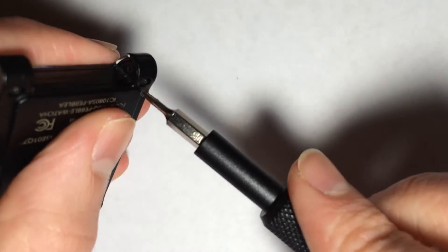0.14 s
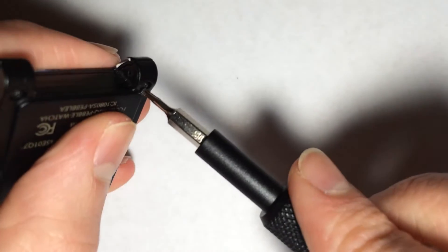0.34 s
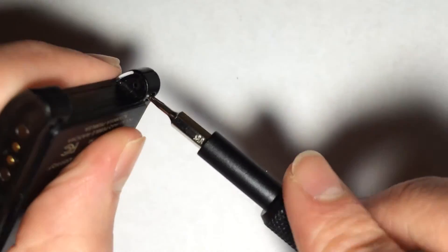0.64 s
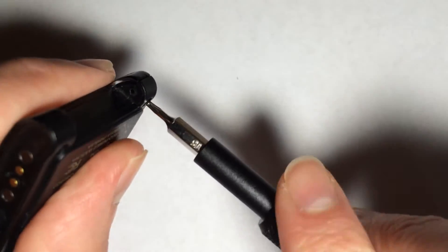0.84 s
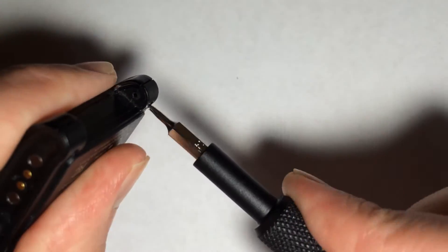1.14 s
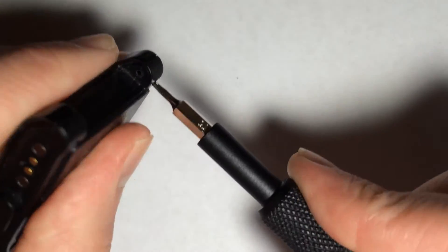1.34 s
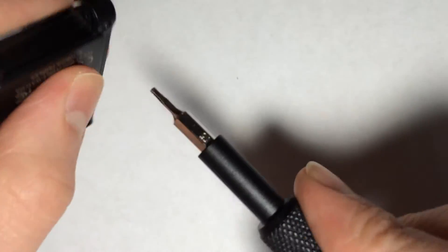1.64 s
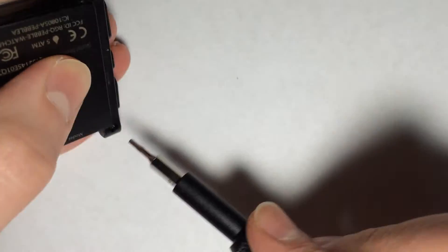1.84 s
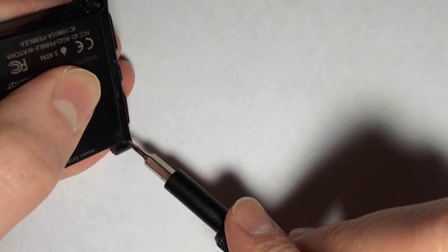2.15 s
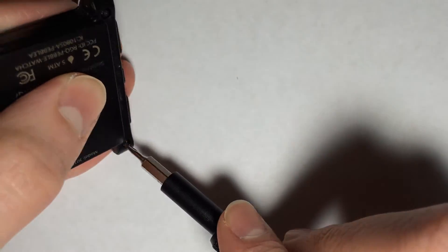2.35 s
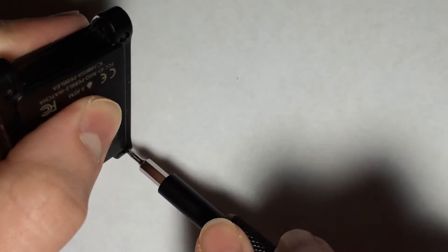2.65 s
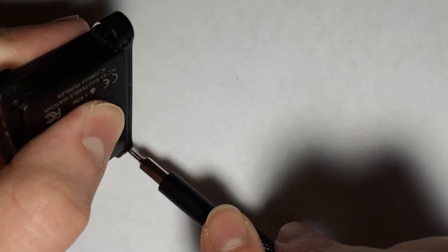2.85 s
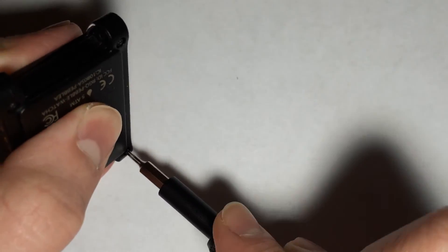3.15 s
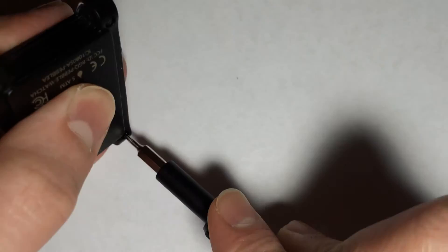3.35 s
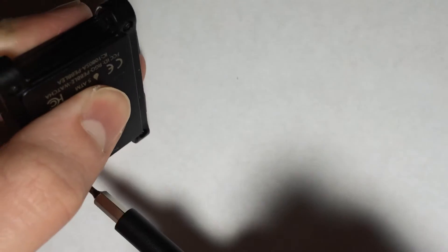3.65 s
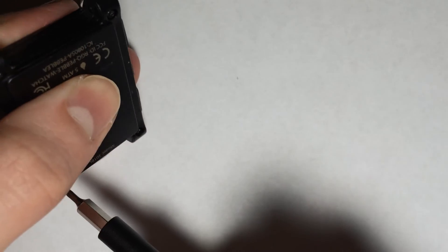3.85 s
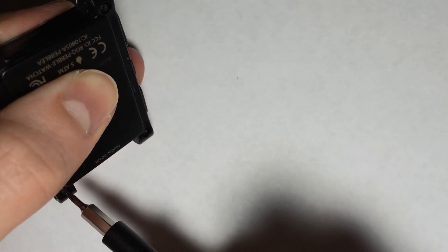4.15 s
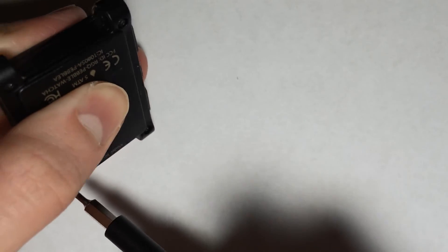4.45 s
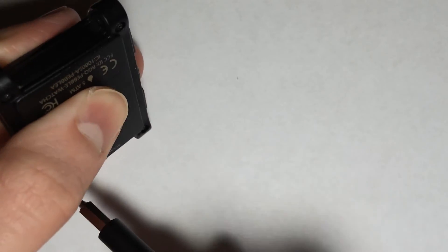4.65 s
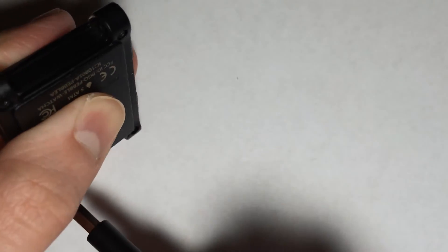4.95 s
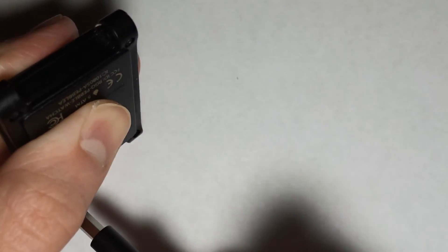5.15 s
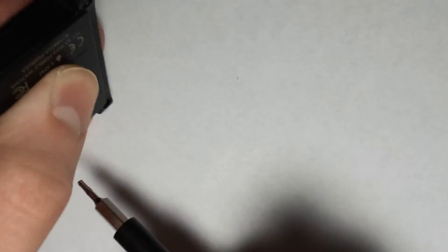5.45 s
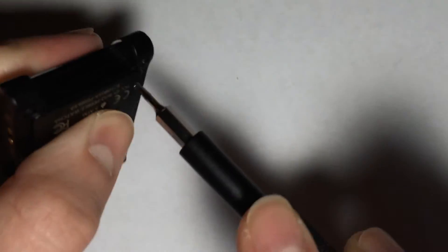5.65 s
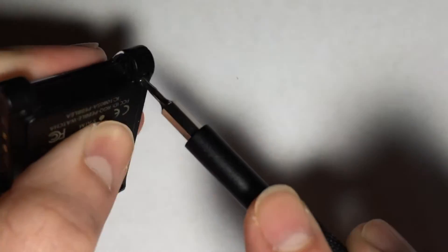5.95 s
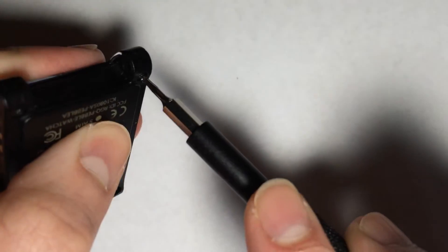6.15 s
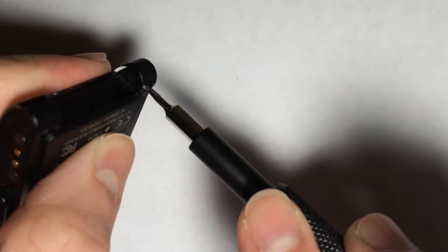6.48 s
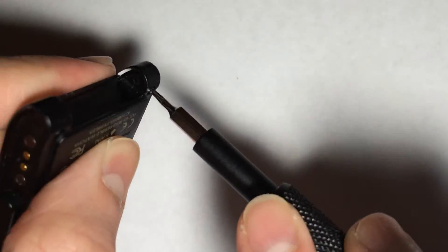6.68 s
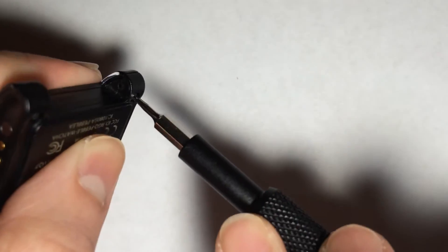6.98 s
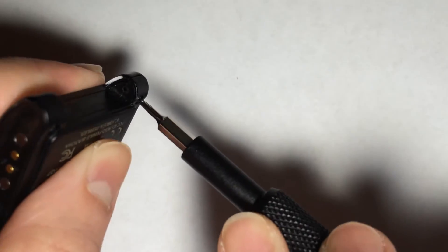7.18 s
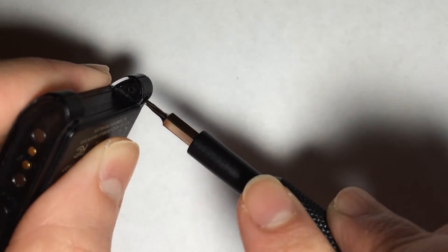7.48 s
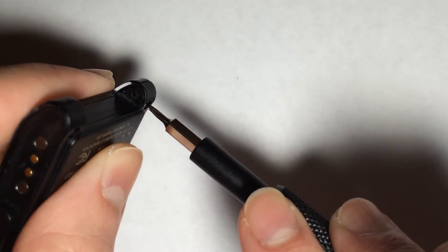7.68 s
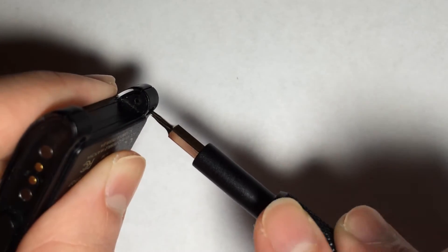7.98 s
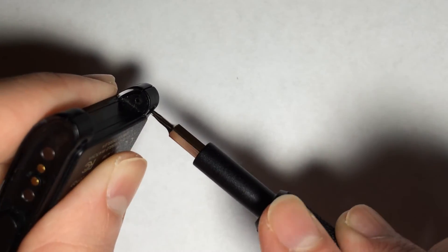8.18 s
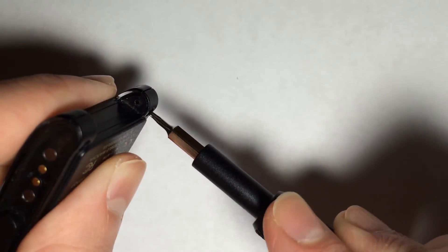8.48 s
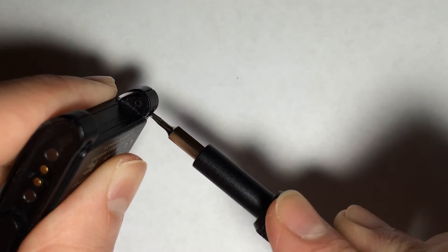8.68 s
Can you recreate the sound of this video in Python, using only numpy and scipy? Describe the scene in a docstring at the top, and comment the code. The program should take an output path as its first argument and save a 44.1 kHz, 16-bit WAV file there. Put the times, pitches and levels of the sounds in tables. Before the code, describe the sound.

A small steel screwdriver bit clicks and ticks irregularly on tiny screws in a plastic case, very close, over a faint steady fan hum.

```python
"""In a small furnished room, a steel screwdriver bit clicks, slips and taps on tiny screws in a hand-held
plastic case close to the microphone. Each tap is a noisy push that rings bit, screw, case and grip.
Fingers slide on case and handle, heard as short swells of grainy noise; the room answers briefly.
Behind the work table a fan hums: sine tones at multiples of its shaft rate, over shaped noise for its air."""
import sys
import numpy as np
from scipy import signal
from scipy.fft import rfft, irfft, next_fast_len
from scipy.io import wavfile
from scipy.ndimage import uniform_filter1d, map_coordinates

SR = 44100
rng = np.random.default_rng(int(sys.argv[2]) if len(sys.argv) > 2 else 0)


def dump(signal):
    """Clip the signal to [-1, 1] and save it as 16-bit WAV at the path in sys.argv[1]."""
    limited = np.clip(np.atleast_2d(signal).T, -1, 1)
    pcm = np.round(limited * 32767).astype(np.int16)
    wavfile.write(sys.argv[1], SR, pcm)


N = 389067  # length of the scene in samples


def taps():
    """Each contact is a blow with a short chatter of metal on metal; it rings every part at its own strength."""
    # what rings, one list per part (bit, screw, shell, lid, shank, tip, grip):
    # [f/Hz, level within the part/dB, time to fall 60 dB/s]
    ringing_parts = [
        [(5350, -7, 0.0011), (5396, 5, 0.005), (5795, -3.5, 0.0052), (6260, -3.5, 0.0059),
         (6990, -20.5, 0.0031)],
        [(3640, -4.5, 0.0059), (3976, 1, 0.0066), (4472, -3.5, .005)],
        [(1100, -4.5, 0.0033), (1274, -5, 0.016), (1490, 9, 0.0079), (1715, 0.5, .009)],
        [(2270, -7, 0.0046), (2334, 3.5, 0.0087), (2570, 6, .009), (3000, 0, 0.0079)],
        [(7483, -0.5, 0.0027), (8050, 4, .003), (8630, 1.5, .003), (9170, -4.5, 0.0043), (9870, -3.5, 0.0028),
         (10355, -1.5, 0.0018)],
        [(10050, -3.5, 0.0031), (11970, -0.5, 0.0025), (12960, 6.5, 0.0016), (13300, -2, 0.009),
         (13900, -6, 0.002)],
        [(313, 1, .009), (615, 3.5, 0.0078), (797, -1.5, 0.0099)],
    ]
    # size of the clean first touch over the chatter, one per part [ratio]: damped plastic feels mostly the touch
    first_touch = [5.9, 5, 11, 3, 4, 2.8, 15]
    # tiny parts send out no bass, and the top fades: [f/Hz, level/dB]
    radiation = [(120, -25), (300, 0), (600, 3.5), (14800, -1.5), (15400, -20), (16300, -36)]
    chatter_t60_s, blur_t60_s = 0.026, 0.002  # times to fall 60 dB: the rattle, the strokes the room hears
    room_db = -20
    wall_s, wall_db = 0.011, -37.5  # echo of the nearest wall: delay, level

    out = np.zeros(N + SR)
    t = np.arange(SR // 25) / SR
    span = np.sqrt(0.005 * SR)  # levels count a part's whole energy as if it lasted 5 ms
    for start_s, pitch_hz, parts_db in contacts():
        blow = np.exp(-(t / 0.0008) ** 2)  # the bit skids into the slot
        chatter = 0.33 * amp(-60 * t / chatter_t60_s)
        force = (blow + chatter) * rng.standard_normal((len(ringing_parts), len(t)))
        force[:, 0] = first_touch  # the first touch is a clean step
        click = np.zeros(len(t))
        stroke = np.zeros(len(t))
        for number, (modes, part_db, push) in enumerate(zip(ringing_parts, parts_db, force)):
            hz, mode_db, t60 = np.transpose(modes)[:, :, None]
            if number == 0:
                # how far the bit is seated tunes its strongest mode
                hz = hz * pitch_hz / hz[np.argmax(mode_db)]
            # the grip shifts each mode a little, in level and in pitch
            scatter_db = 2 * rng.standard_normal((len(modes), 1))
            detune = 1 + 0.015 * rng.standard_normal((len(modes), 1))
            swell = (1 - np.exp(-t * hz / 2.1)) ** 2  # a mode needs a cycle or two to build up
            fade = amp(mode_db + scatter_db - 60 * t / t60)
            ring = swell * fade * np.sin(2 * np.pi * hz * detune * t)
            blurred = (ring * amp(-60 * t / blur_t60_s)).sum(axis=0)
            part = signal.fftconvolve(push, ring.sum(axis=0))[:len(t)]
            click += amp(part_db) * span * part / np.linalg.norm(part)
            stroke += amp(part_db) * span * blurred / np.linalg.norm(blurred)
        # the room hears the parts' colour from all sides
        sound = amp(room_db) * signal.fftconvolve(stroke, room_tail())
        sound[:len(t)] += click
        sound[round(wall_s * SR):][:len(t)] += amp(wall_db) * click
        out[round(start_s * SR):][:len(sound)] += sound
    return filtered(out[:N], lambda hz: amp(along(radiation, hz)))


def contacts():
    """Every tap, and the faint second touch as a firm one settles: time, pitch of the bit, level of each part."""
    # the touches of bit on screw: [t/s, f of the bit/Hz, level of its ring/dB], then relative to that ring
    # [screw level/dB, lid level/dB, weight on shell and grip/dB, sharpness of the steel/dB]
    touches = [(0.2497, 4740, -33.5, -32, -10, -18, -14), (0.251, 4860, -49.5, -3, -11, -13, -6),
               (0.2803, 5200, -63, -8, 1, -14, -14), (0.287, 5170, -58, -7, -15, -10, -13),
               (0.2924, 4880, -46.5, -18, -7, -13.5, -13), (0.388, 5200, -62, -8, -8, -1.5, -10),
               (0.485, 5200, -35.5, -12.5, -11, -23, -10.5), (0.5506, 5130, -37, -8, -10, -19, -5.5),
               (0.5551, 5300, -45, -6, -2.5, -8.5, -3), (0.7141, 5340, -36.5, -7.5, -4.5, -6.5, -9),
               (0.7217, 5270, -36.5, -13, -12, -14, -9), (0.7507, 5200, -63, -6, -4, -17, 1),
               (0.897, 5230, -61, -11, -21, -12, -4), (0.9163, 5250, -56, -8, -30, -24, -4),
               (0.9885, 5550, -53.5, -8.5, -7, -8, -1.5), (1.5085, 5200, -68.5, -11, -13, -6, 1),
               (1.539, 5170, -56, -19, -0.5, -4.5, -19), (1.549, 5130, -50.5, -18, -10, -14, -10),
               (1.5566, 5200, -63, -10, -13, -10, -11), (2.1097, 5200, -58, -1, -2, 3, -15),
               (2.1225, 4940, -39.5, 0, -2.5, -18.5, -7), (2.2513, 4840, -52.5, -13, -8, -15, -13),
               (2.2644, 5200, -65, 2, 3, -11, -7), (2.311, 5300, -45, -6, -14, -22, -18),
               (2.3258, 5230, -59.5, -10, -5, -7, -16), (2.5257, 5500, -49, -11, -16, -28, -2.5),
               (2.6922, 5300, -19, -17.5, -9, -16.5, -2.5), (2.8069, 5250, -32.5, -5.5, -3.5, -7.5, -17),
               (3.5075, 5200, -63.5, -4, -1.5, -10, 4), (3.7251, 4840, -45.5, -8.5, -3, -6, -9),
               (3.775, 5200, -64.5, -7, -5, -1, -17), (3.812, 5240, -66.5, -5, -5, 4.5, -11),
               (3.9182, 5760, -69.5, -7, 3, -4, -19), (4.0207, 5200, -55, -4.5, -6, -3, -14),
               (4.0319, 5420, -33, -9, -5.5, -14.5, -5), (4.041, 5350, -59.5, -10, -5, -9.5, -12),
               (4.1836, 5200, -58.5, -2, -1.5, -2.5, -10), (4.1963, 5200, -55, -17, -6, -17, 0),
               (4.2058, 5160, -42.5, -4.5, -14, -10, -4.5), (4.208, 5430, -28.5, -30, -17, -23, 4.5),
               (4.2211, 5300, -30.5, -15, -10.5, -20, -10), (4.2328, 5150, -40, -14, -15, -15, -14.5),
               (4.237, 5180, -47.5, -8.5, -2.5, -9, -6), (4.245, 5170, -54, -5.5, -3, -1, -9),
               (4.2494, 5780, -42, -4, -7, -14, -7), (4.2663, 5200, -60, -8, -14, -19, -12),
               (4.309, 5100, -47, -3.5, -18, -26, -19), (4.343, 5200, -41, -13, -6, -13.5, -9.5),
               (4.404, 5200, -66, -11, -0.5, -12, -8), (4.75, 5320, -17.5, -15, -9.5, -16, -5),
               (5.1155, 5400, -51, -11, -13, -14.5, -4), (5.508, 5100, -41, -17.5, -9, -8, -14),
               (5.513, 5980, -37, -19, -22, -25, 2.5), (5.5156, 6020, -34, -22, -40, -40, -1),
               (5.8028, 5920, -61.5, -6.5, -1, -17, -7), (6.1829, 5780, -62.5, -8, 4, -7, -2),
               (6.195, 5450, -35, -5.5, -5.5, -19.5, -4), (6.2592, 5100, -63.5, -4, -1, -12, -3),
               (6.3796, 5200, -69, -9, -14, -10, -12), (6.4222, 6380, -50.5, -11, -21, -27, -5.5),
               (6.5575, 5280, -26, -17, -9.5, -22.5, -4.5), (6.965, 5300, -29.5, -5.5, -16.5, -21.5, -9.5),
               (6.969, 5330, -28, -7.5, -13.5, -23.5, -1), (7.06, 5200, -68.5, -10, -12, -7, -5.5),
               (7.2353, 5050, -53, -9, -11, -14.5, 0), (7.4356, 5540, -18, -19, -13.5, -17.5, -3)]
    rebound_s, rebound_spread_s, rebound_db = 0.019, 0.012, -35  # earliest delay, random extra delay, level
    start_s, pitch_hz, bit_db, screw_db, lid_db, weight_db, sharp_db = np.transpose(touches)
    shell_db = weight_db + 0.5
    # the tip answers sharpness more strongly than the shank, but even a dull touch rings it a little
    tip_db = np.maximum(2 * sharp_db - 7, -17)
    grip_db = 1.5 * weight_db - 6.5  # mostly heavy taps reach the grip
    relative_db = np.array([0 * start_s, screw_db, shell_db, lid_db, sharp_db, tip_db, grip_db])
    parts_db = (bit_db + relative_db).T
    late_s = start_s + rebound_s + rebound_spread_s * rng.random(len(start_s))
    firm = bit_db > -45  # only firm taps rebound
    first = zip(start_s, pitch_hz, parts_db)
    second = zip(late_s[firm], pitch_hz[firm], parts_db[firm] + rebound_db)
    return [*first, *second]


def room_tail():
    """Fading noise of energy 1, like sound from all walls, that builds up while the first walls answer."""
    # how long the room rings: [f/Hz, time to fall 60 dB/s]
    decay_times = [(500, 0.14), (1500, 0.49), (3000, 0.22), (6000, 0.19), (14000, 0.1)]
    # the bit beams its ring forward, so the room gets less of it: [f/Hz, level/dB]
    room_colour = [(500, 1.5), (2300, 3), (5400, -5.5), (9000, 0.5), (14000, 0.5)]
    hz, t, z = signal.stft(rng.standard_normal(SR // 4), SR, nperseg=256)
    colour_db = along(room_colour, hz)[:, None]
    fade_db = -60 * t / along(decay_times, hz)[:, None]
    tail = signal.istft(z * amp(colour_db + fade_db), SR, nperseg=256)[1]
    build_up = 1 - np.exp(-np.arange(len(tail)) / SR / 0.0087)
    tail = tail * build_up
    return tail / np.linalg.norm(tail)


def slides():
    """Skin ridges stick and slip on plastic: a fine grainy hiss that swells and fades with each move."""
    # finger moves: [t of the middle/s, length/s, level at the middle/dB]
    moves = [(0.904, .04, -77), (1.775, 0.042, -57.5), (1.863, .06, -74), (1.943, 0.043, -76),
             (2.258, 0.022, -65), (3.034, .05, -69), (3.17, 0.17, -76.5), (3.686, 0.053, -73),
             (3.803, .07, -75), (3.92, 0.05, -76), (4.221, 0.046, -56), (4.561, 0.2, -74),
             (5.54, 0.082, -66), (5.6, 0.064, -71), (5.72, 0.13, -72)]
    # colour of skin on plastic: [f/Hz, level per Hz/dB]
    skin_colour = [(900, -41.5), (2000, 0), (3500, -3.5), (5500, -3.5), (8400, -3), (10000, -3.5),
                   (15200, -7), (15600, -52.5)]
    t = np.arange(N) / SR
    swells = sum(amp(db) * np.exp(-(2 * (t - middle_s) / length_s) ** 2) for middle_s, length_s, db in moves)
    grains = rng.standard_normal(N) * amp(2 * wobble(900))
    return swells * unit(filtered(grains, lambda hz: amp(along(skin_colour, hz))))


def fan():
    """Shaft tones over rushing air; the low, blade-driven tones flutter with the flow, high ones hardly move."""
    # hum tones: [multiple of the shaft rate, rms level before the flutter/dB]
    hum_tones = [(2, -68), (3, -68), (5, -73), (8, -77), (9, -68), (16, -80), (21, -81), (24, -83),
                 (32, -80), (40, -71), (46, -84), (48, -86), (52, -86), (54, -89), (56, -81), (63, -90),
                 (66, -90), (72, -86)]
    # colour of fan air and microphone hiss: [f/Hz, relative level per Hz/dB]
    air_colour = [(20, -37.5), (30, -19), (50, -2.5), (100, -3), (190, -2), (300, -9), (450, -14.5),
                  (700, -12), (930, -22), (1300, -17.5), (1950, -23.5), (2600, -21), (3200, -26.5),
                  (5200, -32), (14500, -40.5)]
    shaft_hz, air_db, hiss_top_hz = 33.83, -60.5, 15020
    turns = np.cumsum(shaft_hz * (1 + 0.0006 * wobble(1.9))) / SR
    hum = 0
    for multiple, db in hum_tones:
        flutter = 1 / (1 + (multiple / 14) ** 2)  # weaker for higher tones
        level = amp(db + flutter * (2.8 * wobble(7.5) - 2.5) + 0.4 * wobble(2.0))
        cycles = multiple * turns + rng.random() + 0.05 * flutter * wobble(3.5)
        hum = hum + level * np.sqrt(2) * np.sin(2 * np.pi * cycles)
    # the air is noise whose level drifts in patches of time and pitch
    z = signal.stft(rng.standard_normal(N), nperseg=1024)[2]
    gusts = uniform_filter1d(rng.standard_normal(z.shape), size=8, axis=0)
    gusts = uniform_filter1d(gusts, size=10, axis=1)
    patchy = signal.istft(z * amp(1.5 * unit(gusts)), nperseg=1024)[1][:N]
    # above its top the hiss drops by 35.05 dB
    air = filtered(patchy, lambda hz: amp(along(air_colour, hz) - 35.05 * (hz > hiss_top_hz)))
    return hum + amp(air_db) * unit(air)


def amp(db):
    """Turn decibels into a plain factor."""
    return 10 ** (np.asarray(db) / 20)


def unit(x):
    """Scale x to an rms of 1."""
    return x / np.sqrt(np.mean(x ** 2) + 1e-20)


def along(points, hz):
    """Read a curve of (Hz, value) points at hz, on a log frequency axis."""
    f, v = np.transpose(points)
    return np.interp(np.log(hz + 1), np.log(f + 1), v)


def wobble(rate):
    """A smooth random curve through rate random points a second."""
    steps = np.arange(0, N + 16, 16)  # worked out every 16 samples, straight lines between
    knots = rng.standard_normal(int(N * rate / SR) + 4)
    curve = map_coordinates(knots, [steps * rate / SR])
    return np.interp(np.arange(N), steps, curve)


def filtered(x, response):
    """Make each frequency of x louder or softer by response(hz)."""
    m = next_fast_len(N + SR // 2)
    return irfft(rfft(x, m) * response(np.fft.rfftfreq(m, 1 / SR)), m)[..., :N]


def scene():
    """Taps, finger slides and fan together, in one channel."""
    return (taps() + slides() + fan())[None]


def record(dry):
    """The microphone stage rounds off the loudest peaks; nothing above the band limit is kept."""
    clip, top_hz = 0.8, 16600  # height that peaks are rounded towards, band limit
    rounded = dry / (1 + np.abs(dry / clip) ** 4) ** (1 / 4)
    return filtered(rounded, lambda hz: np.clip((top_hz - hz) / 300, 0, 1) ** 2)


dry = scene()
out = record(dry)
dump(out)
```